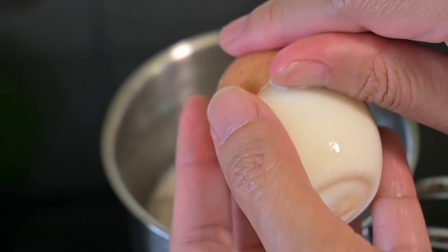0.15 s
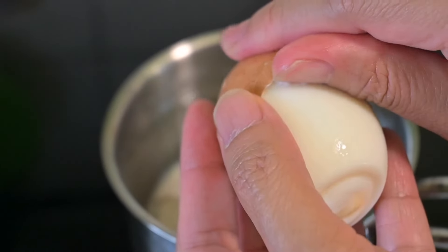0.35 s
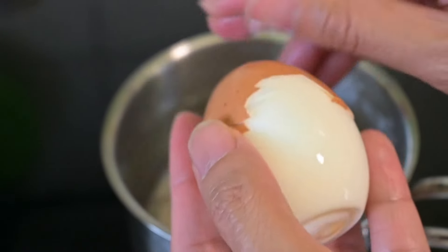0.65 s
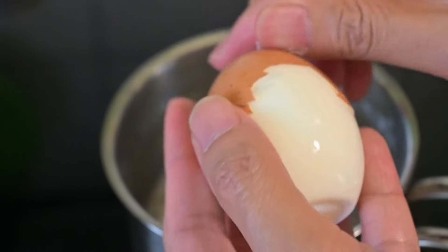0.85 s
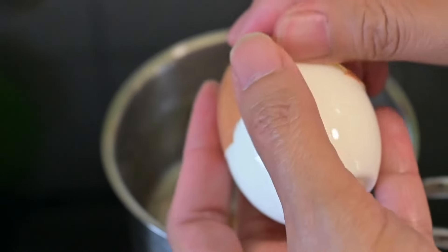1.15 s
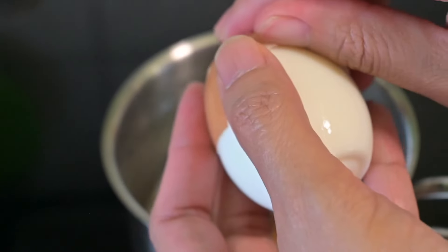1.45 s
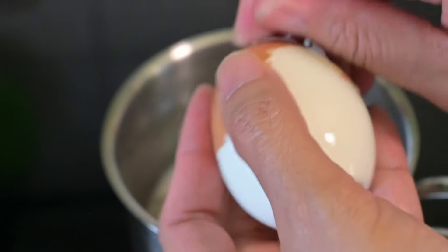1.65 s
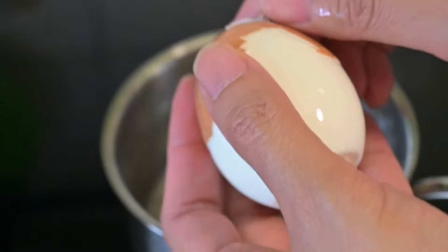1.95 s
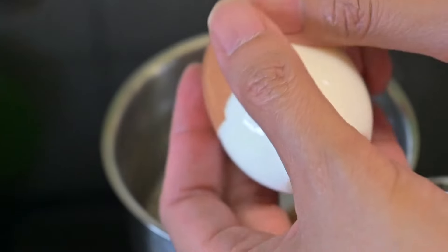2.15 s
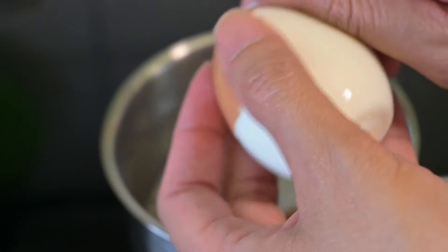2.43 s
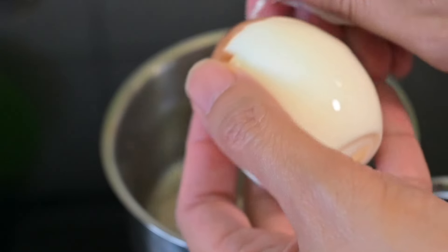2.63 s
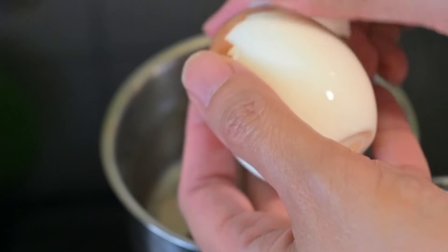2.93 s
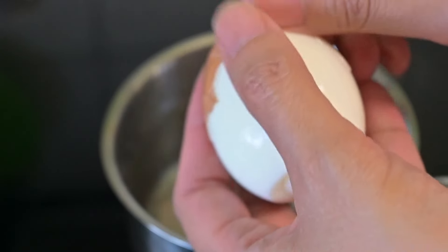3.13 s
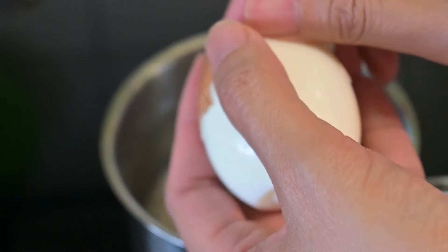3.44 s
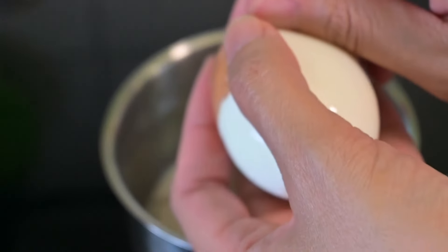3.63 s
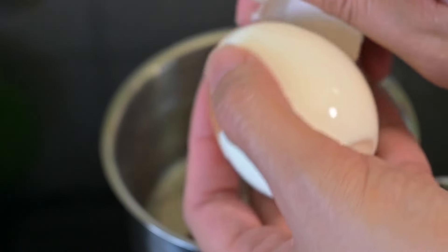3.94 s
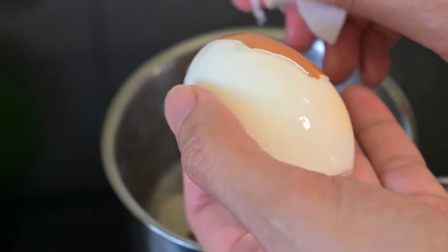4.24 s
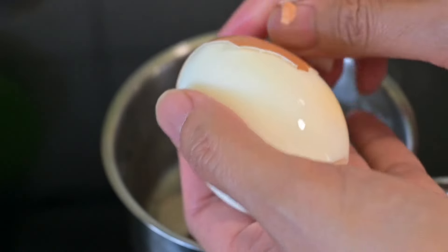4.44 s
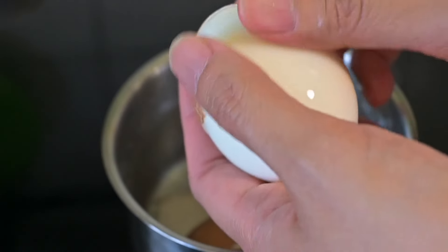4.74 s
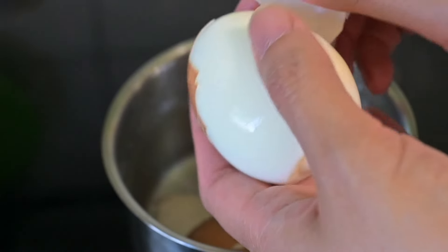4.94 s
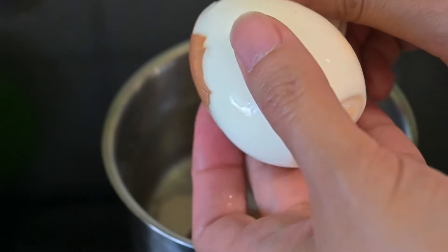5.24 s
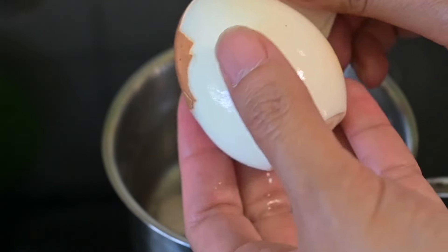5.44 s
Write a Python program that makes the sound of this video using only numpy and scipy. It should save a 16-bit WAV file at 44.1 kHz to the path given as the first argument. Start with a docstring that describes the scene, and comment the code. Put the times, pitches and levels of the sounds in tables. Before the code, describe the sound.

Eggshell clicks and crackles up close as fingers peel it, with a dull simmer, a hum and distant birdsong behind.

```python
"""All the way through, air and simmering water make a dull wash in a small kitchen, and a compressor hums.
Almost at once, fingers start peeling a boiled egg close to a stereo microphone: the skin under the
shell tears in tiny snaps, and each crack makes a flake and the egg ring. Birds sing faintly outside.
The peeling pauses around three seconds while the birds go on, then returns and ends in lighter cracks."""
import sys
import numpy as np
from scipy import signal
from scipy.io import wavfile
from scipy.ndimage import uniform_filter1d

SR = 44100
rng = np.random.default_rng(int(sys.argv[2]) if len(sys.argv) > 2 else 0)


def master_out(mix):
    """Clip the mix to full scale and print it as 16-bit PCM to the path in sys.argv[1]."""
    frames = np.transpose(np.atleast_2d(mix))
    ceiling = np.clip(frames, -1, 1)
    pcm = np.round(ceiling * 32767).astype(np.int16)
    wavfile.write(sys.argv[1], SR, pcm)


N = 246078


def gain_of(db):
    return 10 ** (np.asarray(db) / 20)


def unit_level(x):
    return x / np.sqrt(np.mean(x ** 2) + 1e-20)


def value_at(points, hz):
    f, value = np.transpose(points)
    return np.interp(np.log(hz + 1), np.log(f + 1), value)


def add(mix, start_s, sound):
    part = mix[..., round(start_s * SR):][..., :sound.shape[-1]]
    part += sound[..., :part.shape[-1]]


def band(x, lo_hz, hi_hz):
    return signal.sosfilt(signal.butter(2, [lo_hz, hi_hz], "bandpass", fs=SR, output="sos"), x)


def resonate(x, hz, width_hz):
    """A resonance: shift the pitch down to zero, smooth, and shift back."""
    turn = np.exp(2j * np.pi * np.cumsum(np.full(len(x), hz)) / SR)
    decay = np.exp(-np.pi * width_hz / SR)
    return 2 * (turn * signal.lfilter([1 - decay], [1, -decay], x / turn + 1e-18)).real


def ring(x, hz, share):
    """A steep resonance whose width is a share of its pitch."""
    broad = signal.lfilter(*signal.iirpeak(hz, 0.23 / share, SR), x)
    return signal.lfilter(*signal.iirpeak(hz, 1 / share, SR), broad)


def patchy_noise(spectrum, patchy_db):
    """Shaped noise with drifting louder and softer patches."""
    frames, hz = N // 512 + 5, np.fft.rfftfreq(2048, 1 / SR)
    real, imag, patches = rng.standard_normal((frames, 1025, 3)).T
    patches = unit_level(uniform_filter1d(uniform_filter1d(patches, 20, axis=0), 8, axis=1))
    spectra = (real + 1j * imag) * gain_of(value_at(spectrum, hz)[:, None] + patchy_db * patches)
    return unit_level(signal.istft(spectra, nperseg=2048, noverlap=1536)[1][1024:N + 1024])


def air_and_water():
    """Air and simmering water blend into a dull, wide wash."""
    # noise that left and right share, and noise that sets them apart: f/Hz, relative level/dB
    shared_spectrum = [(15, -59), (25, -2), (65, -12), (99, -20.5), (257, -13.5), (485, -19.5), (539, -25),
                       (649, -19.5), (892, -25.5), (991, -20.5), (1640, -23.5), (3830, -41), (4850, -41.5),
                       (14000, -47.5), (15200, -57)]
    side_spectrum = [(15, -32), (25, -9), (119, -5), (436, -11), (584, -12), (892, -13.5), (1130, -10),
                     (2780, -16.5), (4140, -19), (14000, -28.5), (15200, -37)]
    shared = gain_of(-49.5) * patchy_noise(shared_spectrum, patchy_db=1.24)
    side = gain_of(-59.5) * patchy_noise(side_spectrum, patchy_db=1.5)
    return shared + side * [[1], [-1]]


def compressor():
    """Steady tones of the compressor and fuzzy ones of its pipes and fan."""
    # steady tones: f/Hz, relative level/dB
    tones = [(49.2, -42.8), (98.4, -55), (136.3, -60.5)]
    # fuzzy tones: f/Hz, width/Hz, relative level/dB
    drones = [(28.7, 4, -58), (65, 7.7, -84), (244, 21, -63.5), (270, 19, -62), (335, 3.4, -65),
              (482.2, 13.7, -65), (986, 4.9, -66)]
    t = np.arange(N) / SR
    hum = sum(gain_of(db) * np.sqrt(2) * np.sin(2 * np.pi * (hz * t + rng.random())) for hz, db in tones)
    air = rng.standard_normal(N)
    drone = sum(gain_of(db) * unit_level(resonate(resonate(air, hz, width), hz, 4 * width))
                for hz, width, db in drones)
    return (hum + drone) * gain_of([[.2], [-.2]])


def tear(length_s, db, ring_hz):
    """The skin tears in tiny snaps, denser the harder the pull, that ring the loose flake."""
    swell_db, release_s, release_db = 16, 0.1, 28
    chance, size, sign = rng.random((3, SR // 2))[:, :round((length_s + release_s) * SR)]
    t = np.arange(len(size)) / SR
    level_db = np.interp(t, [0, length_s, length_s + release_s], [db - swell_db, db, db - release_db])
    snaps_per_s = np.clip(3000 * gain_of(level_db + 52), 500, 4000)
    size = gain_of(3.5 * np.minimum(-np.log(size + 1e-9), 4)) * np.sign(sign - .5)
    snaps = size * (chance < snaps_per_s / SR) / np.sqrt(snaps_per_s)
    flake = resonate(snaps, ring_hz, width_hz=900)
    sound = unit_level(band(snaps, 2160, 15400)) + 0.27 * unit_level(flake)
    sound = gain_of(level_db) * unit_level(sound) * signal.windows.tukey(len(t), .05)
    return np.array([np.roll(sound, 1), sound, sound])  # left, right, towards the walls


def crack(ring_db, ring_hz, treble_db, treble_hz, low_db, egg_db, crumble_ms):
    """Splinters build up to a snap and die away, ringing the flake and the egg below it."""
    # resonances of the tapped egg: f/Hz, width/Hz, relative level/dB
    egg_tones = [(910, 140, -20), (1180, 540, 1), (1510, 1900, 13), (1960, 1400, -22)]
    ms = np.arange(2500) / SR * 1000
    rise_ms = min(.12 * crumble_ms ** 2, 6)
    snap_at = round(rise_ms / 1000 * SR)
    detune, pan = rng.uniform(-1, 1, 2)
    chance, size = rng.random(len(ms)), rng.standard_normal(len(ms))
    swell = np.minimum(ms / rise_ms, 1) ** 2 * np.exp(-np.maximum(ms - rise_ms, 0) / crumble_ms)
    snaps = gain_of(-15 + 6 * crumble_ms) * size * (chance < .2) * swell  # longer crumbles splinter more
    snaps[snap_at] = 1
    snaps = signal.fftconvolve(snaps[None], near_echoes(), axes=1)
    # over all directions the splinters even out, so the walls get one plain pulse
    snaps = np.vstack([snaps, np.arange(snaps.shape[1]) == snap_at])
    ring_share = np.clip(0.27 / (1 + crumble_ms / 3.5), .05, .6)  # longer crumbles ring more purely
    flake = ring(snaps, ring_hz, ring_share) + band(band(snaps, 3800, 7300), 3300, 9000) / 8
    low = ring(snaps, 2785 * (1 + .05 * detune), share=0.19)
    treble = ring(snaps, treble_hz, share=0.16) + 0.3 * band(snaps, 7300, 12500)
    edge = band(band(snaps, 12000, 18000), 11000, 19000)
    edge_db = treble_db - 4.5 - 0.5 * (treble_hz / 1000 - 10)
    egg = sum(gain_of(db) * ring(snaps, hz, width / hz) for hz, width, db in egg_tones)
    egg = band(band(egg, 750, 2400), 650, 3000)
    attack_end = round((rise_ms + 6) / 1000 * SR)  # each part's energy up to here sets its level
    sound = 0
    for db, part in [(ring_db, flake), (low_db, low), (treble_db, treble), (edge_db, edge), (egg_db, egg)]:
        direct = np.linalg.norm(part[:2, :attack_end].mean(0))
        to_walls = np.linalg.norm(part[2, :attack_end])
        sound += gain_of(db) * part / [[direct], [direct], [to_walls]]
    sound = band(sound, 800, 20000)  # so small a shell gives off no bass
    return rise_ms / 1000, sound * gain_of([[.6 * pan], [-.6 * pan], [0]])


def near_echoes():
    """A snap reaches the right side first, then bounces off nearby things."""
    # echoes off hands, pot and counter: longest delay/ms, level/dB
    bounces = [(1.3, -15), (3.6, -9), (5.2, -9), (7.5, -13), (12, -13), (19, -15)]
    echoes = np.zeros((2, 1300))
    echoes[0, 1] = echoes[1, 0] = 1
    for ms, db in bounces:
        shared, own = rng.standard_normal(70), rng.standard_normal((2, 70))
        scatter = (shared + 0.8 * own) * np.exp(-np.arange(70) / 22)
        add(echoes, ms * rng.uniform(0.83, 1.0) / 1000, gain_of(db) * scatter / np.linalg.norm(scatter[0]))
    return echoes


def wall_echoes(stretch):
    """Scattered echoes, each pitch fading at its own speed; long waves reach both sides alike."""
    # time to fade by 60 dB, before stretch scales it: f/Hz, t/s
    fade_times = [(1000, 0.52), (2500, 0.6), (5500, 0.62), (10000, 0.45), (15000, 0.38)]
    # how alike left and right are: f/Hz, share
    likeness = [(500, 1), (1500, 1), (4000, 0.12), (10000, .02)]
    taps = np.zeros((2, SR))
    at = np.arange(0, SR - 20, 20) + rng.integers(0, 20, (2, (SR - 1) // 20))
    np.put_along_axis(taps, at, rng.choice([-1., 1.], at.shape), 1)
    hz, t, (left, other) = signal.stft(taps, SR, nperseg=256)
    alike = value_at(likeness, hz)[:, None]
    right = alike * left + np.sqrt(1 - alike ** 2) * other
    fade = gain_of(-60 * t / (stretch * value_at(fade_times, hz)[:, None]))
    echoes = signal.istft(np.array([left, right]) * fade, SR, nperseg=256)[1]
    return echoes / np.linalg.norm(echoes[0])


def kitchen(left, right, to_walls):
    """The walls answer 6 ms after the direct sound."""
    delayed = np.pad(to_walls, (round(.006 * SR), 0))
    echoes = signal.fftconvolve(delayed[None], wall_echoes(stretch=0.49), axes=1)
    return np.array([left, right]) + gain_of(-4.5) * echoes[:, :N]


def peeling():
    """All cracks and tears; the hands move, so the walls answer from four places."""
    # shell cracks, with relative levels: t/s, ring level/dB, ring f/Hz, treble level/dB, treble f/Hz,
    # low ring level/dB, egg level/dB, crumble time/ms
    cracks = [(0.2138, -31.5, 3630, -35, 9090, -41, -41, 3.3),
              (0.2197, -29.5, 5180, -45, 9130, -37, -44, 3.4),
              (0.2422, -34, 5150, -49, 10050, -57, -43, 5.3), (0.2798, -21.5, 3450, -28, 8900, -29, -37, 2),
              (0.3654, -24, 3400, -28, 10590, -27, -37, 0.9),
              (0.415, 5.5, 4100, -8.5, 10500, -22, -17, 1.89), (0.4343, -22, 4640, -9, 9800, -33, -39, 3.1),
              (0.444, -18, 4940, -13, 9310, -25, -37, 0.8), (0.448, -12, 6780, -12, 7800, -32, -23.5, 0.95),
              (0.8357, -9.5, 4700, -10, 7890, -3, -5, 1.57), (1.1942, -36, 6960, -39, 7310, -58, -45, 0.69),
              (1.2431, -38, 3850, -30, 9300, -48, -44, 1.3),
              (1.2543, -20, 5560, -22.5, 9050, -42, -44, 4.2),
              (1.2631, -29, 5500, -26, 8340, -38, -42, 3.4), (1.3321, -28, 5030, -32, 10420, -49, -45, 1.2),
              (1.3687, -14, 4540, -12, 10200, -43, -39, 0.88),
              (1.3832, -13.5, 6630, -11, 10000, -25.5, -26, 0.65),
              (1.6571, -17, 7540, -13, 9400, -23, -32, 1.7),
              (1.6644, -6.5, 6300, -7.5, 7870, -14, -22, 1.7), (2.15, -46, 3700, -40, 10680, -57, -46, 3.7),
              (2.2553, -19, 4700, -24.5, 8400, -28.5, -36, 2.3),
              (2.3387, -31, 4840, -31, 9400, -50, -49, 3), (2.3592, -28, 4800, -45, 10520, -54, -38, 3.2),
              (2.3719, -23, 4680, -24, 8190, -38, -45, 2.9), (2.378, -12.5, 4700, -26, 8000, -32, -44, 2.4),
              (2.4095, -3, 4920, -9.5, 7540, -17, -35, 3.3), (2.4436, -29, 4730, -16, 8500, -32, -32, 2.1),
              (2.4604, -20, 5060, -12, 7520, -43, -25.5, 4.5),
              (2.4708, -7.5, 5650, -12, 11550, -34, -39, 4.3), (2.4913, -18, 7000, -8, 8250, -44, -41, 5.8),
              (2.4986, -21, 6930, -7, 8660, -43, -39, 2.9),
              (2.6013, -22, 5000, -14.5, 11700, -28, -42, 2.05),
              (2.7625, -31, 4230, -25, 11250, -52, -41, 2.3),
              (2.8379, -45, 3850, -28, 12140, -50, -43, 1.9),
              (2.9046, -37, 6840, -31, 8750, -46, -39, 1.65),
              (3.6509, -28, 3740, -20, 10800, -35, -35, 4.6), (3.6821, -26, 3540, -45, 7310, -32, -27, 3.4),
              (3.6942, -23.5, 3820, -27, 9960, -39, -41, 2.7),
              (3.7221, -19, 3900, -33, 7300, -41, -39, 4.4), (3.8109, -30, 3900, -40, 7310, -52, -27, 4.7),
              (3.8177, -16.5, 4200, -41, 7300, -35, -42, 6.4),
              (3.8713, -7, 4880, -16, 7810, -24, -24, 0.92), (3.8763, -6, 5140, -11, 7000, -21, -31, 0.34),
              (3.8779, -5, 5570, -8.5, 9870, -11.5, -22, 1.36),
              (3.881, -11, 5400, -14, 7310, -16.5, -28, 0.97),
              (3.9523, -34, 5510, -27, 10070, -28, -43, 1.5),
              (3.9829, -18.5, 5840, -17, 7310, -44, -37, 1.4),
              (3.9893, -25, 5630, -27, 8200, -47, -34, 0.7),
              (4.0432, -20.5, 5550, -21.5, 8700, -40, -29, 1.8),
              (4.0614, -25, 3740, -30, 7980, -31, -30, 2.6), (4.1646, -25, 4530, -17, 9800, -37, -36, 0.51),
              (4.266, -42, 7170, -25.5, 12400, -42, -44, 0.73),
              (4.3251, -45, 3760, -34, 10290, -54, -33, 4), (4.3629, -26.5, 6700, -20, 9150, -35, -36, 1.8),
              (4.4829, -33, 3940, -26, 12060, -56, -44, 1.2), (4.49, -40, 4530, -29, 11020, -41, -45, 0.9),
              (4.5236, -22.5, 4300, -20, 7310, -29, -27, 1.1),
              (4.6206, -35, 4270, -32, 10690, -57, -45, 0.51),
              (4.8402, -28, 6410, -19, 11950, -44, -42, 2.0),
              (4.8436, -26.5, 5000, -23, 12000, -34, -46, 0.76),
              (4.8656, -41, 5070, -19, 12500, -41, -36, 1.4),
              (4.9214, -24.5, 4440, -24, 11640, -26, -34, 2.9),
              (4.9901, -23, 6500, -27.5, 6900, -18, -27, 0.77),
              (5.0318, -32, 6660, -28, 12000, -49, -48, 0.6),
              (5.0419, -27.5, 5530, -32, 7430, -49, -43, 1.4),
              (5.1175, -28.5, 3700, -27, 7460, -34, -30, 1.6), (5.204, -41, 3620, -36, 9860, -55, -43, 0.6),
              (5.2341, -44, 4750, -37, 8520, -59, -48, 0.5), (5.2813, -46, 7000, -35, 8350, -46, -47, 0.79),
              (5.3173, -41, 3630, -34, 10580, -57, -48, 0.7),
              (5.3252, -39, 3550, -31, 10810, -56, -49, 0.6), (5.378, -26, 3760, -30, 7730, -33, -38, 1.56),
              (5.3964, -48, 3710, -33, 8430, -54, -45, 0.72), (5.5036, -32, 3510, -32, 8300, -32, -47, 1.8),
              (5.5436, -23, 3970, -20.5, 11200, -36, -18.5, 0.55)]
    # thumb pulls that tear the skin: t/s, length/s, top level/dB, flake f/Hz
    pulls = [(0.186, 0.05, -60, 5400), (.32, 0.1, -49, 4600), (.412, 0.035, -34.5, 5400),
             (1.184, 0.089, -53, 6400), (1.361, 0.028, -46.5, 8300), (1.612, 0.1, -53, 6900),
             (2.302, 0.14, -46.5, 4800), (2.427, 0.047, -38.5, 7500), (2.52, 0.082, -55, 8000),
             (2.727, 0.079, -54.5, 4400), (2.897, 0.055, -62.5, 5000), (3.627, 0.083, -51.5, 5030),
             (3.794, 0.035, -46, 5200), (3.84, 0.038, -56, 6000), (3.94, 0.12, -52, 6200),
             (4.128, 0.037, -55, 8900), (4.282, 0.092, -60, 9300), (4.434, 0.12, -55.5, 6300),
             (4.86, 0.062, -52, 5500), (4.938, 0.055, -58, 6800), (5.074, 0.034, -62, 6800),
             (5.238, 0.076, -67, 8600), (5.35, 0.03, -57, 6100), (5.469, 0.093, -63, 6400)]
    places = np.zeros((4, 3, N))
    for k, (snap_s, *settings) in enumerate(cracks):
        rise_s, sound = crack(*settings)
        add(places[k % len(places)], snap_s - rise_s, sound)
    for start_s, *settings in pulls:
        add(places[0], start_s, tear(*settings))
    return sum(kitchen(*place) for place in places)


def bird_note(length_s, first_hz, last_hz, db, buzz_hz):
    """A gliding whistle that flutters in moving air; a fast shake of the pitch makes it buzz."""
    waver_hz, flutter_db = 25, 3.5
    t = np.arange(0, length_s, 1 / SR)
    shake, flutter = (unit_level(band(rng.standard_normal(SR // 2), 19.8, 236))[-len(t):]
                      for _ in range(2))
    hz = np.linspace(first_hz, last_hz, len(t)) + np.hypot(buzz_hz, waver_hz) * shake
    swell = gain_of(db + flutter_db * flutter) * signal.windows.tukey(len(t), .4)
    return swell * np.sqrt(2) * np.sin(2 * np.pi * np.cumsum(hz) / SR)


def birds():
    """Faraway birds, partly heard by way of the walls."""
    # bird notes: t/s, length/s, first f/Hz, last f/Hz, relative level/dB, buzz depth/Hz
    notes = [(0.287, 0.11, 4290, 3160, -54, 390), (1.21, 0.037, 3700, 4250, -53.5, 50),
             (1.257, 0.071, 3160, 3030, -54.5, 220), (1.515, 0.096, 4540, 4520, -58, 50),
             (1.536, 0.19, 3540, 2950, -53, 200), (1.517, 0.12, 2040, 1920, -57.5, 23),
             (1.703, 0.11, 2405, 2097, -51.5, 18), (1.763, 0.066, 3840, 4140, -53.5, 370),
             (1.826, 0.059, 2400, 2680, -49, 24), (1.833, 0.077, 2980, 3530, -53.5, 170),
             (1.979, 0.28, 3360, 3440, -64, 220), (2.22, 0.091, 3210, 3220, -60, 70),
             (2.683, 0.16, 2114, 2406, -52.5, 21), (2.716, 0.048, 4730, 5280, -56.5, 240),
             (2.766, 0.032, 3750, 4180, -48.5, 240), (2.81, 0.053, 4300, 3740, -57, 300),
             (2.875, 0.073, 2990, 3060, -52.5, 30), (2.975, .26, 2720, 2490, -56.5, 43),
             (3.108, 0.075, 4630, 4550, -59, 60), (3.129, 0.16, 3600, 3075, -52.5, 320),
             (3.21, 0.043, 4120, 4160, -51.5, 110), (3.25, 0.065, 4350, 4400, -59, 82),
             (3.25, 0.18, 3120, 3540, -57, 290), (3.444, 0.062, 3250, 3210, -54.5, 24),
             (3.533, 0.21, 2463, 2180, -58.5, 35), (4.162, 0.36, 9000, 7800, -63, 60),
             (4.42, 0.12, 2520, 2470, -64, 28), (4.923, 0.074, 4600, 4050, -57, 240),
             (4.934, 0.037, 3340, 3300, -52.5, 55), (5.022, 0.04, 2470, 2410, -58, 30),
             (5.321, .04, 3420, 3515, -49.5, 5.5), (5.438, 0.034, 4400, 4600, -59, 200),
             (5.461, 0.086, 3290, 3520, -57.5, 130), (5.48, 0.08, 3030, 2974, -55.5, 40)]
    song = np.zeros(N)
    for start_s, *settings in notes:
        add(song, start_s, bird_note(*settings))
    echoes = signal.fftconvolve(song[None], wall_echoes(stretch=.9), axes=1)[:, :N]
    return gain_of(-5) * song + gain_of(-8) * echoes


def scene():
    return air_and_water() + peeling() + birds() + compressor()


def record(dry):
    """Cuts the treble above 16 kHz."""
    lowpass = signal.firwin(301, 16000, window=("kaiser", 9), fs=SR)
    return signal.oaconvolve(dry, lowpass[None], "same")


dry = scene()
out = record(dry)
master_out(out)
```